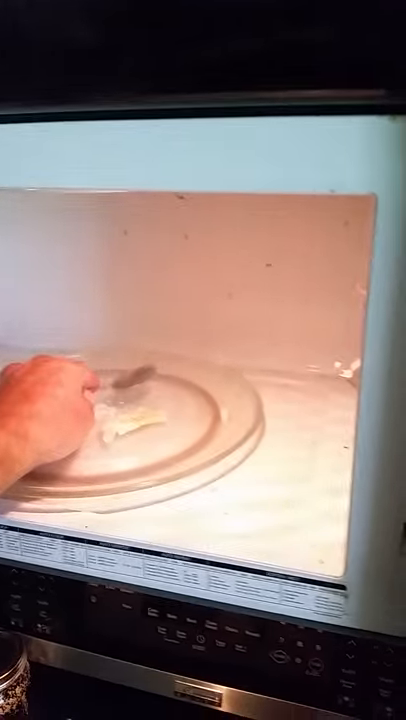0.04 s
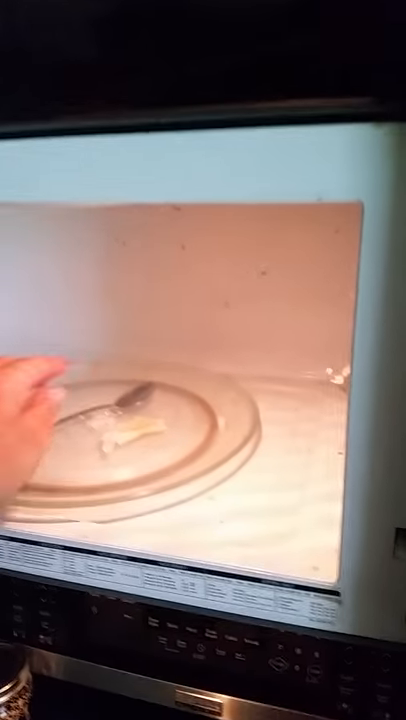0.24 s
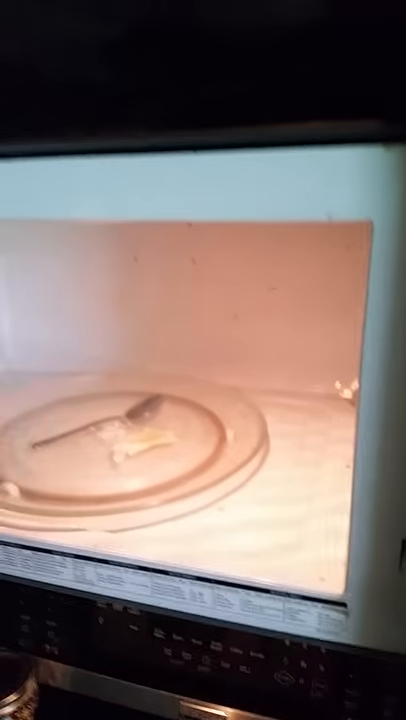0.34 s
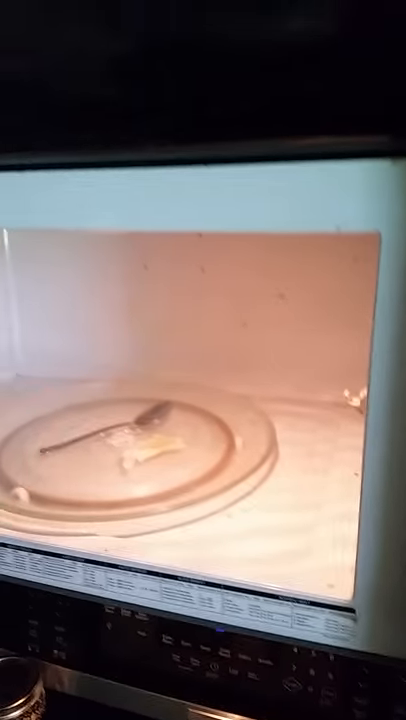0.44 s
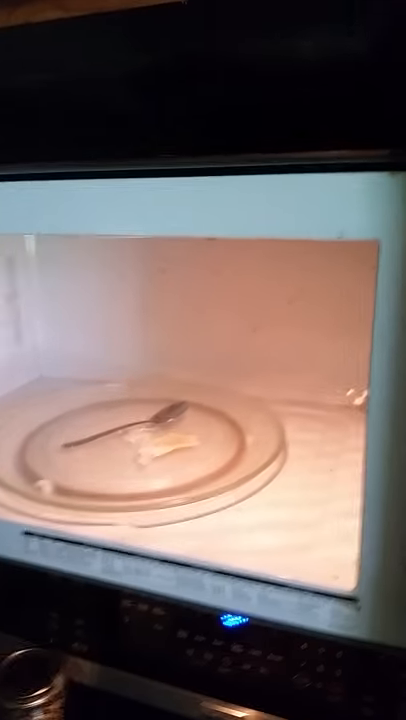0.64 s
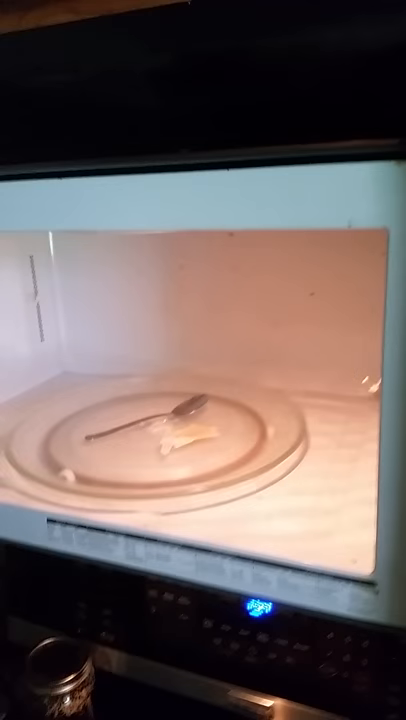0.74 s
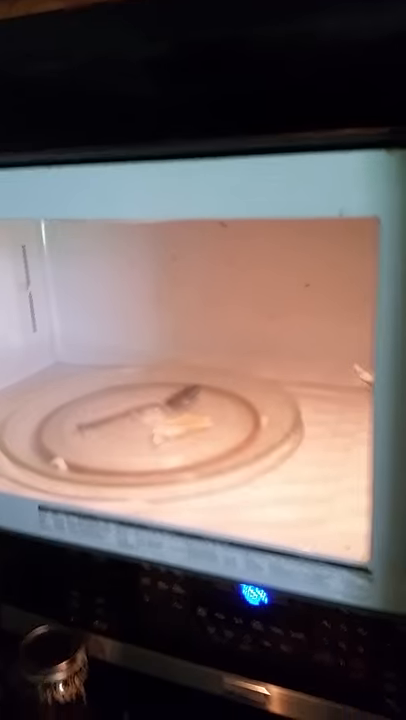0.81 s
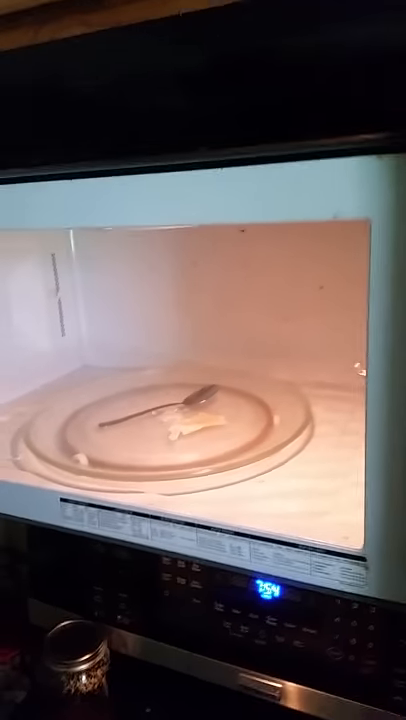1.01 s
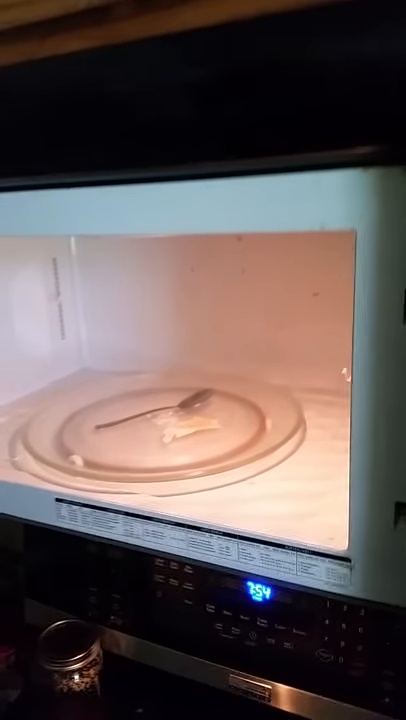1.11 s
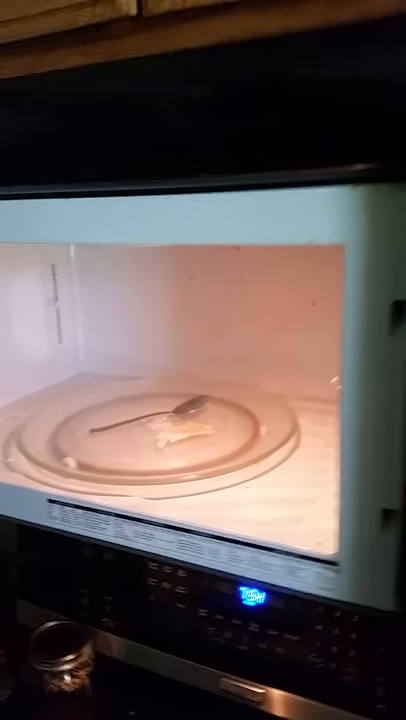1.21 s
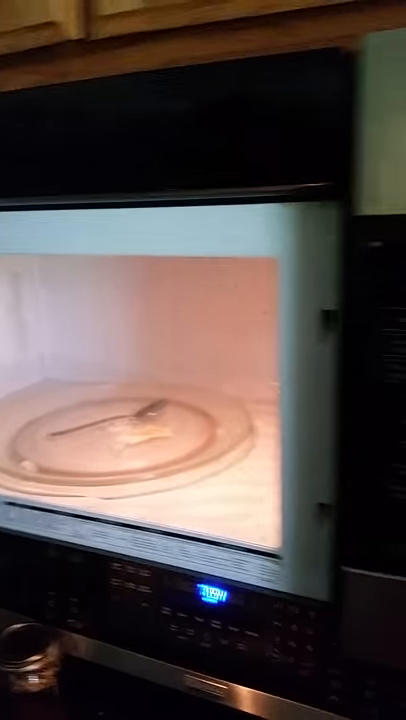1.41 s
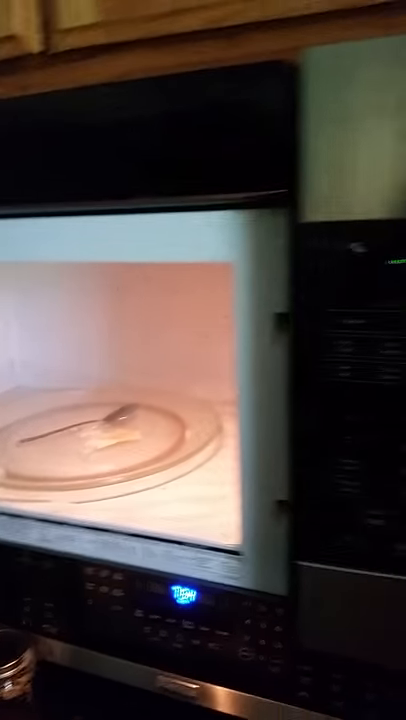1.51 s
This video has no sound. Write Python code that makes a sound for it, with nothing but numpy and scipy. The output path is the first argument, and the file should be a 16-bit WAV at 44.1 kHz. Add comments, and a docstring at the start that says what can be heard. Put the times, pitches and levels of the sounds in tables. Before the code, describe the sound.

Sharp ringing clink and rapid rattle of a spoon dropped on a glass plate over low hum

```python
"""A metal spoon lands on the glass turntable of an open microwave oven, chatters and rings out.
Each touch excites decaying modes of spoon and glass and washes of close resonances, mostly echoed.
A light tap and a dull knock on the oven's casing follow, made of decaying shaped noise.
Behind them lie a wavering appliance hum of sine lines, a noise rumble and faint hiss.
The clatter pushes the microphone's gain down, so the hum ducks and slowly returns."""
import sys
import numpy as np
from scipy import signal
from scipy.fft import rfft, irfft
from scipy.io import wavfile
from scipy.ndimage import uniform_filter1d, minimum_filter1d

SR = 44100
rng = np.random.default_rng(int(sys.argv[2]) if len(sys.argv) > 2 else 0)


def bounce(signal):
    """Save signal as a 16-bit WAV file at the path given by the first command-line argument."""
    frames = np.transpose(np.atleast_2d(signal))
    limited = np.clip(frames, -1, 1)
    pcm = np.round(limited * 32767).astype(np.int16)
    wavfile.write(sys.argv[1], SR, pcm)


N = 68355
TIME = np.arange(N) / SR   # seconds

CLINK_RISE_S = 0.0024   # rise time constant of the clatter's washes and echo
# The spoon touches the glass. Each row: start in seconds, force on the plate in dB,
# force on the spoon in dB, resonance that the touch favours in Hz.
TOUCHES = [(.2068, -3, -1.5, 12060), (.211, -3, -4, 8730), (.2345, -7.5, -2.5, 14600),
           (.259, -13.5, -5, 15500), (.275, 1.5, -7, 8730), (.284, -0.5, -2.5, 8730),
           (.297, -3.5, 0.5, 15580), (.311, 1.5, 0, 15500), (.3245, -5.5, -1.5, 15500),
           (.3475, -1, -2.5, 15500), (.353, -6, -1, 15500), (.3765, -7, 2.5, 14600),
           (.3945, -6.5, -2, 15500), (.403, -3, -5, 12000), (.4205, -3, -2.5, 14600),
           (.427, -9.5, -5.5, 8730), (.439, -17.5, -3, 11900), (.446, -5.5, -5, 12000),
           (.465, -12, -10.5, 10200), (.481, -25, -7, 11900), (.497, -13, -10, 11900)]
TOUCH_S, PLATE_FORCE_DB, SPOON_FORCE_DB, FAVOURED_HZ = np.transpose(TOUCHES)


def spoon_on_glass():
    """The plate, spoon and zings are echoed; the bending and the landing knock stay dry."""
    direct = glass_plate() + spoon() + zings()
    return landing() + spoon_bending() + direct + room(direct)


SPOON_DB = 10.5   # gain on the mode levels
SPOON_WASH_DB, SPOON_WASH_T60_S = -18.5, 0.085
# The spoon's modes. Each row: frequency in Hz, left level in dB and right level in dB before SPOON_DB,
# t60 in seconds before MODE_T60_SCALE.
SPOON = [(8340, -41, -57, .2), (8657, -42, -56, .18), (8728, -35, -50, .27), (8830, -44, -60, .18),
         (9137, -42, -57, .22), (10205, -37, -47, .2), (10720, -46, -47, .16), (11110, -42, -38, .19),
         (11845, -40, -32, .25), (11885, -47, -38, .18), (12020, -44, -30, .23), (12533, -46, -37, .19),
         (12799, -47, -39, .2), (13395, -43, -34, .18), (13804, -45, -37, .23), (14050, -48, -42, .18),
         (14575, -44, -35, .12), (14604, -42, -34, .18), (15020, -48, -43, .17), (15485, -41, -33, .16),
         (15528, -36, -28, .18)]
# Close resonances around the spoon. Each row: frequency in Hz, relative left and right levels in dB.
SPOON_WASH = [(5030, -41.5, -38), (7760, -16.5, -24.5), (8570, 4, -14), (8900, -4.5, -21),
              (11000, -2.5, -4), (13500, -2.5, 4.5), (15600, -3.5, -1)]


def spoon():
    """The spoon's own metal modes ring above a bright, short wash."""
    modes = from_db(SPOON_DB) * ring(TOUCH_S, SPOON_FORCE_DB, SPOON)
    close_modes = cavity(TOUCH_S, SPOON_FORCE_DB, SPOON_WASH, SPOON_WASH_T60_S)
    return modes + from_db(SPOON_WASH_DB) * close_modes


ZING_DB, ZING_T60_S, ZING_RISE_S = 2, 0.062, 0.0033
ZING_PAN_DB = -8   # taken off the left and added on the right for high modes; reversed for low ones
ZING_LEFT_BELOW_HZ = 10500   # lower spoon modes radiate to the left, higher ones to the right


def zings():
    """Each touch briefly brings out the spoon mode nearest to its favoured resonance."""
    out = np.zeros((2, N))
    mode_hz = np.array(SPOON)[:, 0]
    for start_s, force_db, favoured_hz in zip(TOUCH_S, SPOON_FORCE_DB, FAVOURED_HZ):
        hz = mode_hz[np.argmin(np.abs(mode_hz - favoured_hz))]
        phase = TOUCH_SCATTER_RAD * rng.standard_normal()
        tone = np.sin(2 * np.pi * hz * TIME + phase) * dying(start_s, ZING_T60_S, ZING_RISE_S)
        pan_db = ZING_PAN_DB * np.sign(hz - ZING_LEFT_BELOW_HZ)
        out += from_db([[pan_db], [-pan_db]]) * from_db(ZING_DB + force_db) * tone
    return out


BEND_DB, BEND_FOLLOWS = 9, 0.4   # gain; share of the touches' swing in plate force
SETTLE_S, SETTLED_T60_S = 0.435, 0.2   # the spoon comes to lie flat, which damps its bending
# The spoon's slow bending mode. Each row: frequency in Hz, left level in dB and right level in dB
# before BEND_DB, t60 in seconds before MODE_T60_SCALE.
BEND = [(527.6, -39, -49.5, 0.54)]


def spoon_bending():
    """The spoon flexes at a low pitch until lying flat on the glass damps it."""
    damping = from_db(-60 * np.maximum(TIME - SETTLE_S, 0) / SETTLED_T60_S)
    return from_db(BEND_DB) * damping * ring(TOUCH_S, BEND_FOLLOWS * PLATE_FORCE_DB, BEND)


PLATE_DB = 9   # gain on the mode levels
PLATE_WASH_DB, PLATE_WASH_T60_S = -31.5, 0.25
# The glass plate's modes. Each row: frequency in Hz, left level in dB and right level in dB
# before PLATE_DB, t60 in seconds before MODE_T60_SCALE.
PLATE = [(805, -59, -59, .3), (880, -57, -58, .25), (1156, -42, -38, .33), (1185, -47, -44, .25),
         (1265, -50, -50, .25), (2073, -44, -48, .28), (2190, -47, -45, .25), (2228, -46, -43, .28),
         (3070, -51, -49, .28), (3300, -48, -50, .25), (3455, -41, -46, .28), (3662, -52, -50, .25),
         (4285, -54, -51, .22), (4810, -51, -47, .24), (4912, -49, -44, .28), (5085, -50, -45, .24),
         (5605, -54, -51, .22), (5768, -52, -51, .28), (6420, -50, -48, .22), (6560, -47, -45, .24),
         (6812, -45, -42, .25), (6998, -55, -52, .3), (7480, -51, -58, .18), (7860, -50, -62, .2)]
# The dish's own long ring. Each row: as for the plate's modes, in Hz, dB, dB and seconds.
GLASS_RING = [(837, -64, -65, 1.6)]
# Close resonances in the oven cavity. Each row: frequency in Hz, relative left and right levels in dB.
PLATE_WASH = [(300, -6.5, -8), (520, -15, -6.5), (724, -22, -21), (790, -3.5, -5), (930, -18.5, -18.5),
              (1200, -16.5, 7.5), (1500, -7.5, -18), (1900, -11, -19.5), (2040, 0, 7.5), (2450, -6, -12.5),
              (2690, -20, -13), (3300, 8, 5), (3860, -7, -9.5), (5200, -2.5, 1), (5340, -6, -4),
              (6000, -28.5, -26), (7130, 8.5, 5), (7250, -17, -16), (7560, -4, -18), (11000, -22.5, -24.5)]


def glass_plate():
    """The glass modes and the dish's long ring sound through the cavity's wash."""
    modes = from_db(PLATE_DB) * ring(TOUCH_S, PLATE_FORCE_DB, PLATE + GLASS_RING)
    close_modes = cavity(TOUCH_S, PLATE_FORCE_DB, PLATE_WASH, PLATE_WASH_T60_S)
    return modes + from_db(PLATE_WASH_DB) * close_modes


LANDING_DB, LANDING_T60_S = -33.5, 0.11
# Knock of the first landing. Each row: frequency in Hz, relative level in dB.
LANDING = [(200, -13.5), (500, -0.5), (900, -0.5), (1700, -3.5), (2300, -0.5), (4200, 2.5), (5300, -12),
           (6000, -30), (8000, -32.5)]


def landing():
    """The first touch adds a knock of decaying shaped noise."""
    return from_db(LANDING_DB) * wash(TOUCH_S[:1], [0], LANDING, LANDING_T60_S, CLINK_RISE_S)


UNEVEN_DB = 3.5   # a mode's share differs from touch to touch
MODE_T60_SCALE = 0.8
SIDE_PHASE_RAD = 1.7   # spread of a mode's phase between the two sides
TOUCH_SCATTER_RAD = 1.59   # how far out of step with its own vibration the spoon rebounds


def ring(times, force_db, modes):
    """Every touch strikes every decaying mode unevenly; each mode reaches the sides at its own phase."""
    out = np.zeros((2, N))
    at = (times * SR).astype(int)
    for hz, left_db, right_db, t60 in modes:
        uneven, scatter = rng.standard_normal((len(at), 2)).T
        strength = from_db(force_db + UNEVEN_DB * uneven)
        phase = 2 * np.pi * hz * at / SR + TOUCH_SCATTER_RAD * scatter
        clicks = np.full(N, 1e-18, complex)
        clicks[at] = strength * np.exp(1j * phase)
        # a one-pole complex resonator: the pole turns at the mode's pitch and shrinks with its decay
        pole = np.exp((2j * np.pi * hz - np.log(1000) / (MODE_T60_SCALE * t60)) / SR)
        tone = signal.lfilter([1], [1, -pole], clicks)
        turned = tone * np.exp(1j * SIDE_PHASE_RAD * rng.standard_normal())
        out[0] += from_db(left_db) * rms_one(tone.imag)
        out[1] += from_db(right_db) * rms_one(turned.imag)
    return out


WEAK_MODES_DB, WEAK_MODES_T60_S = 1, 0.18   # faint modes, relative to the wash


def cavity(times, force_db, spectrum, t60):
    """A short wash of contact noise, and a thicket of faint modes that answers every touch alike."""
    clicks = np.zeros((1, N))
    clicks[0, (times * SR).astype(int)] = from_db(force_db)
    response = noise(spectrum) * dying(0, WEAK_MODES_T60_S, CLINK_RISE_S)
    thicket = signal.fftconvolve(clicks, response, axes=1)[:, :N]
    contact = wash(times, force_db, spectrum, t60, CLINK_RISE_S)
    return contact + from_db(WEAK_MODES_DB) * rms_one(thicket)


ROOM_DB, ROOM_DELAY_S = -10.5, 0.004
ROOM_T60_S, ROOM_TREBLE_T60_S, ROOM_TREBLE_HZ = 0.39, 0.29, 7000


def room(x):
    """Diffuse echo of cavity and kitchen, different on each side; the treble dies sooner."""
    white = rng.standard_normal((2, N))
    low = signal.sosfilt(signal.butter(2, ROOM_TREBLE_HZ, fs=SR, output="sos"), white)
    echo = low * dying(ROOM_DELAY_S, ROOM_T60_S, CLINK_RISE_S)
    echo += (white - low) * dying(ROOM_DELAY_S, ROOM_TREBLE_T60_S, CLINK_RISE_S)
    return from_db(ROOM_DB) * signal.fftconvolve(x, rms_one(echo) / np.sqrt(N), axes=1)[:, :N]


TAP_S, TAP_DB, TAP_T60_S, TAP_RISE_S = 1.022, -56.5, 0.17, 0.0047   # first contact with the casing
CASING_DB, CASING_T60_S, KNOCK_RISE_S = -40, 0.34, 0.0015
# Color of the tap. Each row: frequency in Hz, relative level in dB.
TAP = [(300, -2.5), (1000, -2), (2300, -17), (3000, -22.5), (6500, -36), (8500, -30), (12500, -23),
       (15500, -31)]
# Knocks on the casing. Each row: start in seconds, relative force in dB.
KNOCKS = [(1.029, 7.5), (1.052, -12), (1.065, 1), (1.076, -6)]
# Resonance of the casing. Each row: frequency in Hz, relative level in dB.
CASING = [(40, -3.5), (110, -9.5), (205, -2), (245, -1.5), (285, -4), (315, 2.5), (350, 0), (410, -8),
          (470, -9), (600, -16), (1100, -27.5), (2300, -41), (3500, -66), (8000, -87)]


def casing():
    """A light tap, then a dull shudder of the sheet-metal casing."""
    times, force_db = np.transpose(KNOCKS)
    tap = wash([TAP_S], [0], TAP, TAP_T60_S, TAP_RISE_S)
    shudder = wash(times, force_db, CASING, CASING_T60_S, KNOCK_RISE_S)
    return from_db(TAP_DB) * tap + from_db(CASING_DB) * shudder


HUM_WAVER, HUM_WAVER_HZ = 0.34, 14   # spread of level (as a share) and of phase (rad); drift rate
# Appliance hum. Each row: frequency in Hz, rms level in dB before waver and HUM_LEVEL.
HUM = [(100, -50), (121, -41), (197, -48.5), (223, -52), (252, -46.5), (470, -58)]
# The hum swells and sinks. Each row: time in seconds, gain in dB.
HUM_LEVEL = [(0, 2), (.17, -2.5), (.3, -3.5), (.85, -1.5), (1, -4), (1.55, -4.5)]


def appliance_hum():
    """Sine lines, each wavering at random in level and phase."""
    hum = 0
    for hz, db in HUM:
        level = from_db(db) * np.sqrt(2) * (1 + HUM_WAVER * drift(HUM_WAVER_HZ))
        phase = 2 * np.pi * (hz * TIME + rng.random()) + HUM_WAVER * drift(HUM_WAVER_HZ)
        hum = hum + level * np.sin(phase)
    return in_time(HUM_LEVEL) * hum


# Color of the rumble, the hiss and the faint high rustle. Each row: frequency in Hz, relative level in dB.
RUMBLE = [(20, -23.5), (55, -1), (70, -7), (95, 6.5), (160, -8), (250, -7.5), (450, -11), (700, -21.5),
          (1200, -26), (1700, -33), (2200, -30), (2700, -49), (5000, -56.5), (7000, -62.5)]
HISS = [(1500, -0.5), (2800, 4), (4200, 3), (6300, -15.5), (8500, -3), (11000, -8), (13000, 0),
        (15500, -9.5)]
RUSTLE = [(4000, -32.5), (7000, -18), (8500, -2), (10500, -5.5), (12500, 3), (15500, -5)]
# Their levels over time. Each row: time in seconds, level in dB.
RUMBLE_LEVEL = [(0, -37), (.18, -36), (.6, -38.5), (.98, -42), (1.1, -42.5), (1.28, -40.5), (1.42, -38.5),
                (1.55, -36)]
HISS_LEVEL = [(0, -59.5), (.2, -59), (.6, -63), (.95, -70.5), (1.15, -73), (1.55, -82)]
RUSTLE_LEVEL = [(.88, -88), (.95, -57), (1.02, -59), (1.1, -81), (1.3, -88.5), (1.4, -75), (1.55, -77)]


def kitchen_noise():
    """Low rumble, faint hiss and a high rustle: shaped noises that follow level curves."""
    rumble = in_time(RUMBLE_LEVEL) * noise(RUMBLE)
    hiss = in_time(HISS_LEVEL) * noise(HISS)
    rustle = in_time(RUSTLE_LEVEL) * noise(RUSTLE)
    return rumble + hiss + rustle


def wash(times, force_db, spectrum, t60, rise_s):
    """Many close resonances, fed by each blow and dying together; rms 1."""
    power = sum((from_db(db) * dying(s, t60, rise_s)) ** 2 for s, db in zip(times, force_db))
    return rms_one(np.sqrt(power) * noise(spectrum))


# Stereo likeness of every noise. Each row: frequency in Hz, left-right correlation from -1 to 1.
LIKENESS = [(60, .95), (150, 0.84), (300, 0.88), (600, 0.17), (2000, 0.12), (8000, 0.034)]


def noise(spectrum):
    """Stereo noise shaped by one dB column, or one per side, and more alike in the bass; rms 1."""
    log_hz = np.log(np.arange(N // 2 + 1) * SR / N + 1)
    hz, *columns = np.transpose(spectrum)
    gain = from_db([np.interp(log_hz, np.log(hz), column) for column in columns])
    at_hz, alike = np.transpose(LIKENESS)
    alike = np.clip(np.interp(log_hz, np.log(at_hz), alike), -1, 1)
    mid, side = rfft(rng.standard_normal((2, N)))
    stereo = np.sqrt(1 + alike) * mid + np.sqrt(1 - alike) * side * [[1], [-1]]
    return rms_one(irfft(gain * stereo, N))


def drift(rate_hz):
    """Slow random motion, noise rolled off above the rate; rms 1."""
    hz = np.arange(N // 2 + 1) * SR / N
    return rms_one(irfft(rfft(rng.standard_normal(N)) / (1 + (hz / rate_hz) ** 2) ** 2, N))


def dying(start_s, t60, rise_s):
    """Envelope that rises from its start and dies away exponentially."""
    age = np.maximum(TIME - start_s, 0)
    return (1 - np.exp(-age / rise_s)) * np.exp(-np.log(1000) * age / t60)


def in_time(rows):
    """Gain from a curve of seconds and dB."""
    return from_db(np.interp(TIME, *np.transpose(rows)))


def from_db(db):
    """Decibels to gain."""
    return 10 ** (np.asarray(db) / 20)


def rms_one(x):
    """Scale to an rms of 1."""
    return x / np.sqrt(np.mean(x ** 2) + 1e-20)


def scene():
    """Spoon on glass, knock on the casing, and the kitchen behind them."""
    return spoon_on_glass() + casing() + appliance_hum() + kitchen_noise()


THRESHOLD_DB, MAX_CUT_DB = -20, 17.5
LOOK_AHEAD_S, ATTACK_S, HOLD_S, RELEASE_DB_PER_S = 0.018, 0.0056, 0.54, 12.5


def gain_control(x):
    """Looks ahead, cuts the gain on loud sound, holds it, then lets it climb back."""
    power = uniform_filter1d(np.mean(x ** 2, axis=0), size=128)
    cut_db = np.clip(10 * np.log10(np.abs(power) + 1e-12) - THRESHOLD_DB, 0, MAX_CUT_DB)
    cut_db = np.interp(TIME + LOOK_AHEAD_S, TIME, cut_db)
    # hold the deepest cut of the last HOLD_S
    half_hold = int(HOLD_S * SR / 2)
    cut_db = -minimum_filter1d(-cut_db, 2 * half_hold + 1, origin=half_hold, mode="nearest")
    # the cut eases no faster than the release slope
    slope_db = RELEASE_DB_PER_S * TIME
    cut_db = np.maximum.accumulate(cut_db + slope_db) - slope_db
    smoothing = np.exp(-1 / (ATTACK_S * SR))
    return x * from_db(-signal.lfilter([1 - smoothing], [1, -smoothing], cut_db))


CUTOFF_HZ = 15750


def record(dry):
    """Gain control, then a steep cut of the top."""
    top_cut = signal.ellip(12, 0.2, 80, CUTOFF_HZ, fs=SR, output="sos")
    return signal.sosfilt(top_cut, gain_control(dry))


dry = scene()
out = record(dry)
bounce(out)
```